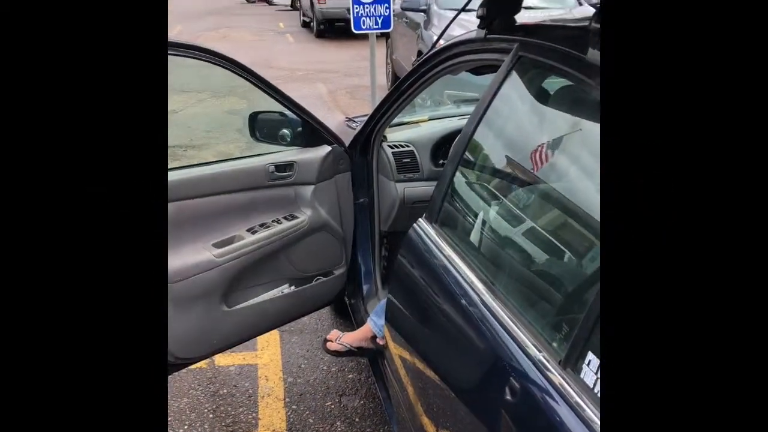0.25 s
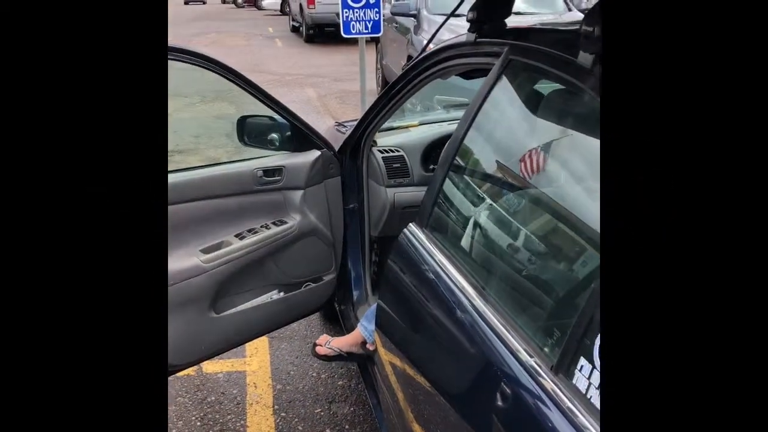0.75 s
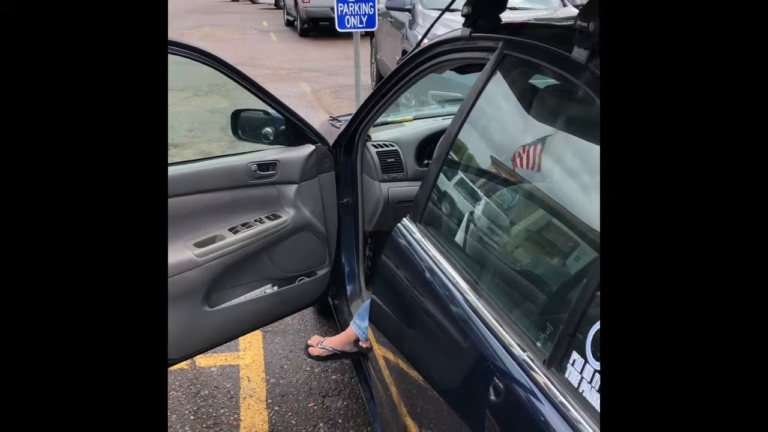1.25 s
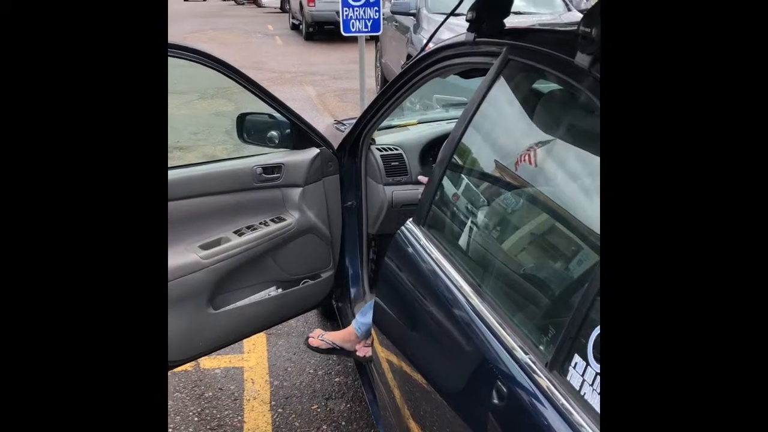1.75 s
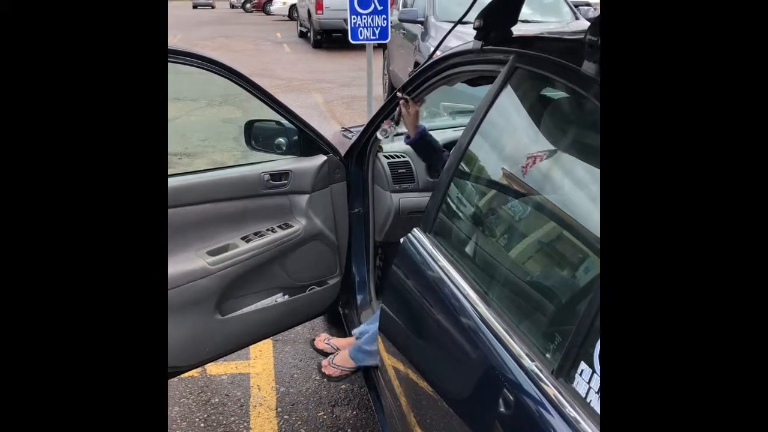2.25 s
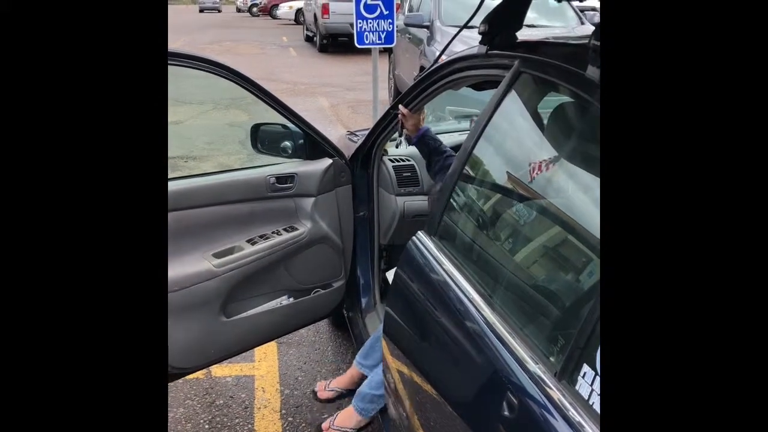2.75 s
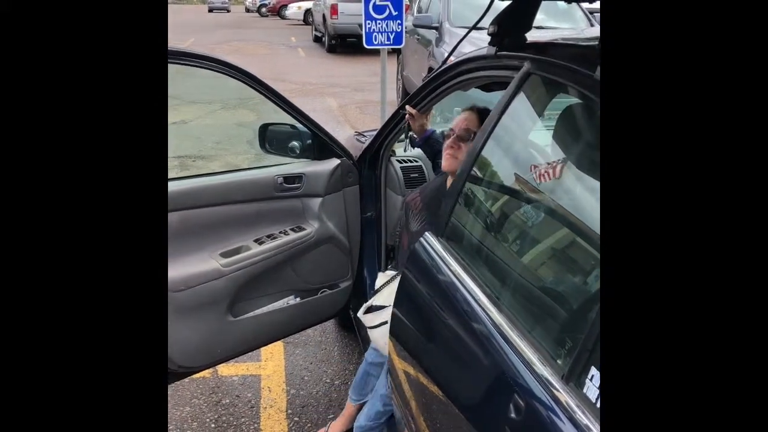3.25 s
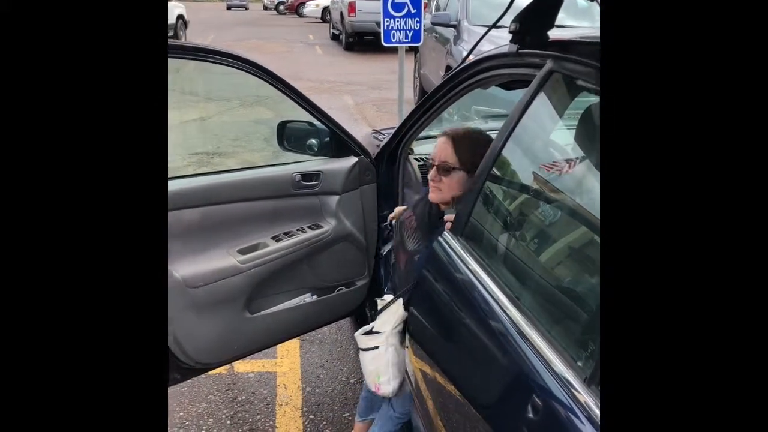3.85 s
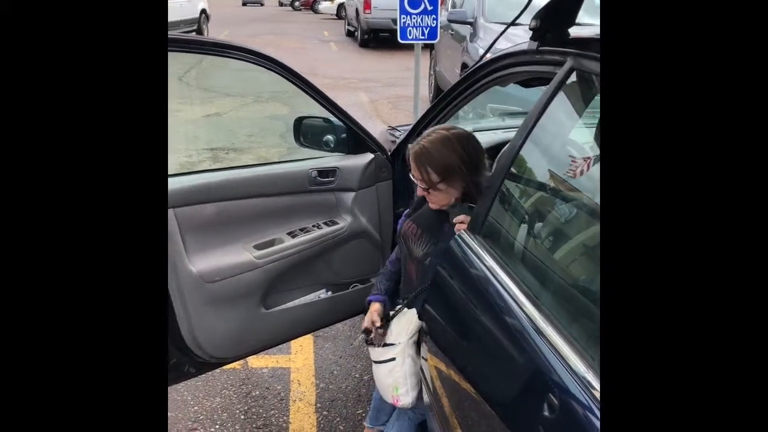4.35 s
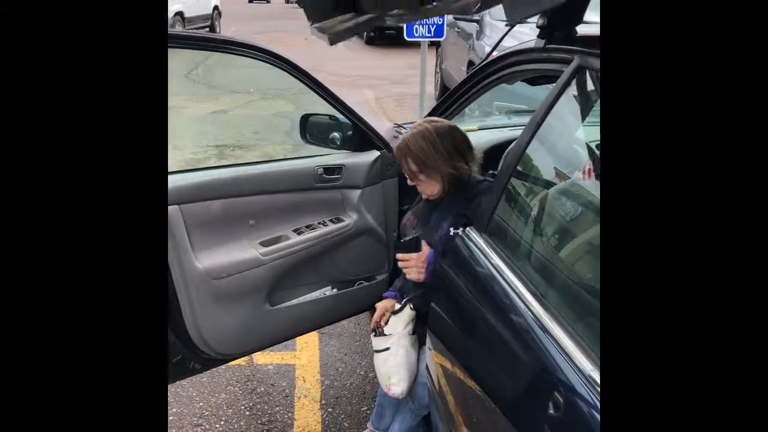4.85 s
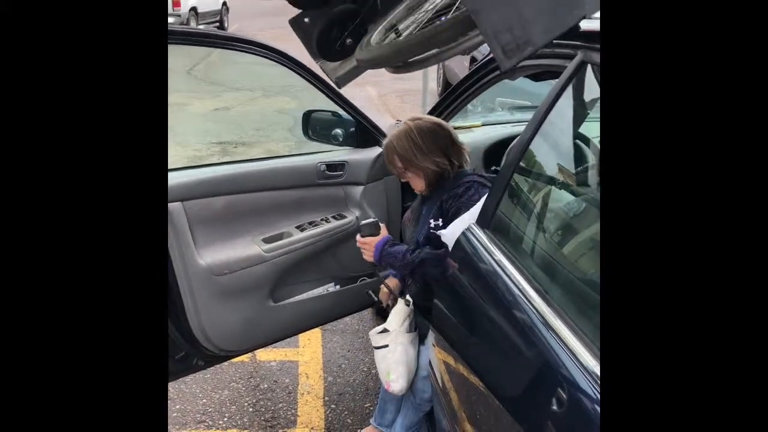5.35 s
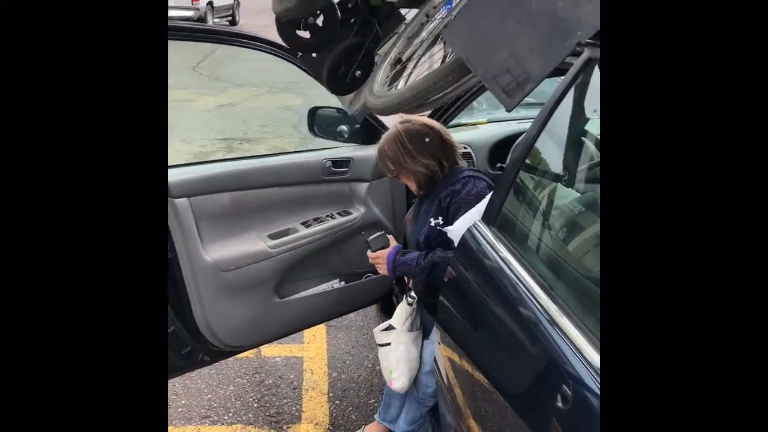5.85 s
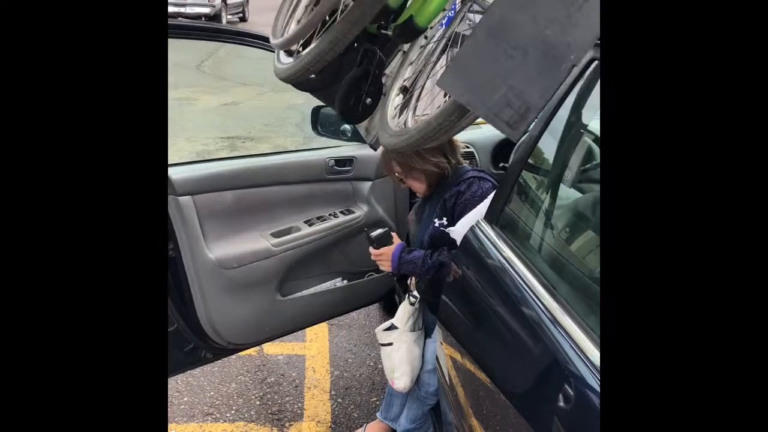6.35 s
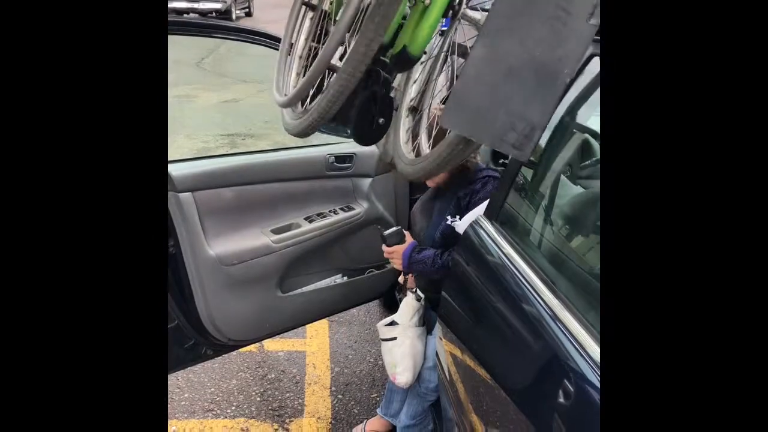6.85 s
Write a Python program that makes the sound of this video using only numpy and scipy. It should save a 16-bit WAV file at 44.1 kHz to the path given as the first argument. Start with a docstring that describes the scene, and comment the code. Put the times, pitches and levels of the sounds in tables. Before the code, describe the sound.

An open parking lot heard close by, with a short scatter of echo from cars. Throughout, a low electric motor hum gains speed steadily, fuller from about 3 seconds, over an idling engine's throb, traffic rumble and soft tyre wash. A thin high sizzle and stronger rumble fade after the first second. A dull knock comes at 0.2, brief creaks at 0.6 to 0.8, then a heavy clattering clunk at 0.85. Sharp snaps follow at 1.1 and, strongest, 1.35, as the engine tone strengthens. Keys jingle lightly from 2.0 to 2.9. Soft knocks at 3.8 lead into the brightest key ring at 4.2 to 4.5, with cloth rustle. Around 5 the engine climbs quickly, with knocks at 5.1 and scattered jingling until 6. A dull knock lands at 6.15; gears whirr from 6.3, squealing briefly at 6.6, and a low engine boom swells at 6.9 to the end at 7.1.

```python
"""A parking lot: a roof carrier's electric motor slowly lowers a folded wheelchair beside a car.
The motor is shaft harmonics with narrow noise bands; an idling engine, firing-rate harmonics, picks up speed.
Traffic is coloured noise. Knocks of the frame ring resonances and catches snap as bursts of noise.
The driver's bunch of keys jingles in decaying modes over grains of cloth and drops into a bag;
late on, the carrier's gears whirr and squeal."""
import sys
import numpy as np
from scipy import signal
from scipy.fft import rfft, irfft, next_fast_len
from scipy.io import wavfile
from scipy.ndimage import uniform_filter1d, map_coordinates

SR = 44100
rng = np.random.default_rng(int(sys.argv[2]) if len(sys.argv) > 2 else 0)


def generate_wav(sig):
    """Save sig (samples, or channels by samples) to the path in sys.argv[1] as 16-bit PCM at SR."""
    pcm = np.round(np.clip(np.atleast_2d(sig).T, -1, 1) * 32767).astype(np.int16)
    wavfile.write(sys.argv[1], SR, pcm)


N = 312228


def amp(db):
    """Decibels to gain."""
    return 10 ** (np.asarray(db) / 20)


def unit(x):
    """Scale to rms 1."""
    return x / np.sqrt(np.mean(x ** 2) + 1e-20)


def along(points, hz):
    """Interpolate (frequency [Hz], value) points on a log-frequency axis."""
    f, v = np.transpose(points)
    return np.interp(np.log(hz + 1), np.log(f + 1), v)


def curves(rows):
    """One value per sample for each column after the time."""
    s, *cols = np.transpose(rows)
    return [np.interp(np.arange(N) / SR, s, c) for c in cols]


def wobble(rate):
    """A smooth random curve with rate knots a second."""
    knots = rng.standard_normal(int(N * rate / SR) + 4)
    return map_coordinates(knots, [np.arange(N) * rate / SR])


def swell(start, length, db, attack, release):
    """Gain that rises up to the start, holds for the length and falls away."""
    corners = [start - attack, start, start + length, start + length + release]
    return amp(db) * np.interp(np.arange(N) / SR, corners, [0, 1, 1, 0])


def filtered(x, response):
    """Shape x by a gain that depends on frequency."""
    m = next_fast_len(len(x) + 8192)
    return irfft(rfft(x, m) * response(np.fft.rfftfreq(m, 1 / SR)), m)[:len(x)]


def noise(spectrum, size=N):
    """Noise of rms 1 with a (frequency [Hz], relative level [dB]) colour."""
    return unit(filtered(rng.standard_normal(size), lambda hz: amp(along(spectrum, hz))))


def resonate(x, modes):
    """Pass x through parallel (frequency [Hz], width [Hz], level [dB]) resonances of alternating sign."""
    def response(f):
        return sum((-1) ** k * amp(db) * 1j * f * width / (centre * centre - f * f + 1j * f * width)
                   for k, (centre, width, db) in enumerate(modes))
    return filtered(x, response)


def patchy(x, depth_db):
    """Give a noise drifting patches in time and frequency, at rms 1."""
    z = signal.stft(x, nperseg=1024)[2]
    field = uniform_filter1d(rng.standard_normal(z.shape), 5, axis=0)
    field = uniform_filter1d(field, 9, axis=1)
    return unit(signal.istft(z * amp(depth_db * unit(field)), nperseg=1024)[1][:N])


def burst(t, attack, t60):
    """A quick rise and an exponential decay."""
    return (1 - np.exp(-t / attack)) * amp(-60 * t / t60)


def struck(x):
    """Scale a hit so that its first 20 ms have rms 1."""
    return x / np.sqrt(np.mean(x[:SR // 50] ** 2) + 1e-20)


def add(track, s, sound):
    """Mix a sound into the track at time s."""
    part = track[round(s * SR):][:len(sound)]
    part += sound[:len(part)]


def hum(speed_hz, orders, flutter_db, drift):
    """Multiples of a shaft speed, each a little unsteady in level and phase."""
    angle = 2 * np.pi * np.cumsum(speed_hz) / SR
    total = 0
    for k, db in orders:
        level = amp(db + flutter_db * wobble(7))
        total = total + level * np.sin(k * angle + rng.uniform(0, 2 * np.pi) + drift * wobble(5.9))
    return np.sqrt(2) * total


# speed of the carrier's motor shaft at the start [Hz] and its steady gain [Hz per s]
SHAFT_HZ, SHAFT_HZ_PER_S = 13.06, 0.407


def shaft_speed():
    """The drive gains speed steadily as the chair swings down."""
    return SHAFT_HZ + SHAFT_HZ_PER_S * np.arange(N) / SR


# gear hum: (time [s], level before trim [dB])
GEAR_HUM = [(0.0, -53), (1.0, -47), (2.7, -43), (3.4, -41), (5.7, -41), (7.08, -45)]
# hum of the motor's housing: (multiple of the shaft speed, relative level [dB])
BODY_ORDERS = [(8, 1), (9, -1), (11, 0), (16, -13)]
BODY_DB = -45


def motor():
    """Gear and housing hum at multiples of the rising shaft speed."""
    shaft_hz = shaft_speed()
    gear_db, = curves(GEAR_HUM)
    gear = amp(gear_db - 1) * hum(shaft_hz, [(12, 0)], flutter_db=1, drift=.1)
    body = amp(BODY_DB) * hum(shaft_hz, BODY_ORDERS, flutter_db=1.8, drift=.06)
    return gear + body


# narrow tones of the idling engine (the first three rows, below 1 kHz) and of the motor's whine (the rest):
# (start [s], length [s], pitch [Hz], level [dB])
NARROW_TONES = [(0.05, 0.5, 468, -55), (0.95, 0.45, 808, -54), (1.4, 0.84, 522, -53.5),
                (2.9, 0.94, 1240, -59.5), (5.165, 0.84, 1203, -54), (6.2, 1, 1310, -56)]
TONE_WIDTH_HZ = 24


def narrow_tones():
    """Narrow bands of noise swell at fixed pitches: first of the idling engine, then the motor's whine."""
    tones = 0
    for start, length, hz, db in NARROW_TONES:
        band = unit(resonate(rng.standard_normal(N), [(hz, TONE_WIDTH_HZ, 0)]))
        tones = tones + swell(start, length, db, attack=0.19, release=0.7) * band
    return tones


# nearby engine: (time [s], crank speed [Hz], firing tone level [dB])
ENGINE = [(0.0, 21.4, -35.5), (0.64, 21, -35.5), (1.03, 19.4, -41), (1.065, 17, -27.5), (1.16, 17.8, -31),
          (1.3, 17.8, -30), (1.65, 18.1, -26.5), (2.05, 18.4, -26.5), (2.24, 17.7, -34.5),
          (2.6, 17.9, -28.5), (2.8, 18.2, -40), (4.7, 19.5, -45.5), (4.85, 20.6, -35), (5.1, 26.6, -32),
          (5.55, 26.7, -30.5), (6.0, 27.2, -38), (6.65, 27.4, -34.5), (7.08, 30.6, -34)]
# each set of orders: (multiple of the crank speed, relative level [dB])
FIRING_ORDERS = [(4, 0), (6, -12), (8, -17)]
THROB_ORDERS = [(2, -1.5), (3, 1)]
DRONE_ORDERS = [(5, 0), (7, -9)]
# the low throb booms briefly: (start [s], length [s], extra level [dB])
SURGE = (6.92, 0.2, 5.5)
IDLE_HZ = 18.5  # crank speed at idle
THROB_DB, THROB_DB_PER_HZ = -55.5, 1.29  # low throb at idle; it grows with crank speed
THROB_DB_PER_HZ_PER_S, FULL_LOAD_HZ_PER_S = 0.47, 6.9  # and with acceleration, up to full load
DRONE_DB, DRONE_DB_PER_HZ = -40.5, -1  # drone at idle; it thins with crank speed


def engine():
    """The exhaust throbs at the firing rate; unequal cylinders add the orders around it, more so under load."""
    crank_hz, firing_db = curves(ENGINE)
    over_idle_hz = crank_hz - IDLE_HZ
    acceleration = uniform_filter1d(np.gradient(crank_hz) * SR, size=SR // 3)
    load = np.clip(acceleration, 0, FULL_LOAD_HZ_PER_S)
    throb_db = THROB_DB + THROB_DB_PER_HZ * over_idle_hz + THROB_DB_PER_HZ_PER_S * load
    start, length, surge_db = SURGE
    throb_db = throb_db + surge_db * swell(start, length, db=0, attack=0.13, release=0.1)
    drone_db = DRONE_DB + DRONE_DB_PER_HZ * over_idle_hz
    firing = amp(firing_db) * hum(crank_hz, FIRING_ORDERS, flutter_db=1.2, drift=0.036)
    throb = amp(throb_db) * hum(crank_hz, THROB_ORDERS, flutter_db=2.5, drift=0.14)
    drone = amp(drone_db) * hum(crank_hz, DRONE_ORDERS, flutter_db=-1.5, drift=0.13)
    # the lowest order sounds only faintly
    return filtered(firing + throb + drone, lambda hz: amp(along([(36, -29), (52, -0.5)], hz)))


# (time [s], tyre wash level before trim [dB], hiss level before trim [dB])
TRAFFIC = [(0.0, -43.5, -51.5), (3.81, -45.5, -58.5), (4.02, -47, -56), (5.98, -45.5, -56.5),
           (6.29, -44, -55.5), (6.49, -44, -52), (7.08, -44.5, -57)]
# colours of the three layers: (frequency [Hz], relative level [dB])
RUMBLE = [(20, -33), (35, -25), (50, 0), (65, 1.5), (100, 1.5), (150, -3.5), (200, -1.5), (260, -12.5),
          (400, -23), (800, -46)]
WASH = [(150, -29), (250, -1), (311, -0.5), (338, -2.5), (450, -7), (518, -7), (600, -6), (722, -7),
        (824, -5), (1060, -7.5), (1200, -7), (1310, -8.5), (2400, -20), (3120, -25), (5280, -120)]
HISS = [(1000, 4.5), (2000, -2), (3200, 2.5), (5000, -2.5), (8000, -9), (12000, -14.5), (16000, -34)]
# the rumble swells: (start [s], length [s], rise before scaling [dB])
RUMBLE_SWELLS = [(0.0, 0.96, 6), (2.75, 0.26, 1.5)]
# a thin high sizzle that fades away: (start [s], length [s], level [dB])
SIZZLE = (0.0, 1.05, -46)
RUMBLE_DB = -38.5  # between swells, about which the level wavers


def traffic():
    """Rumble, tyre wash and hiss from the streets as coloured noise; a thin sizzle lies on top at first."""
    wash_db, hiss_db = curves(TRAFFIC)
    rise_db = sum(db * swell(start, length, db=-1, attack=0.12, release=0.14)
                  for start, length, db in RUMBLE_SWELLS)
    rumble = amp(RUMBLE_DB + rise_db + 2.4 * wobble(9.2)) * noise(RUMBLE)
    wash = amp(wash_db + 0.5 + 0.067 * wobble(30)) * patchy(noise(WASH), depth_db=1.5)
    hiss = amp(hiss_db + 3.0) * patchy(noise(HISS), depth_db=3.0)
    sizzle_noise = noise([(10000, -43), (13000, -18), (14300, -1), (15300, 4), (16000, 4.5)])
    sizzle = swell(*SIZZLE, attack=0.1, release=0.89) * patchy(sizzle_noise, depth_db=1.0)
    return rumble + wash + hiss + sizzle


KNOCK_DETUNE, KNOCK_SCATTER_DB = 0.015, 1.5  # modes shift with the pose: pitch (share) and level
STRIKE_DB_PER_OCTAVE = 10  # modes fall off this fast away from the favoured pitch


def favour(modes, hz):
    """The place of a blow favours the modes near one pitch, a little differently each time."""
    scatter = rng.standard_normal((len(modes), 2))
    return [(centre * (1 + KNOCK_DETUNE * shift), width,
             db + KNOCK_SCATTER_DB * size - STRIKE_DB_PER_OCTAVE * abs(np.log2(centre / hz)))
            for (centre, width, db), (shift, size) in zip(modes, scatter)]


# dull knocks of the frame, levels before trim:
# (time [s], thud level [dB], favoured thud pitch [Hz], clatter level [dB], favoured clatter pitch [Hz])
KNOCKS = [(0.226, -24.5, 205, -54, 1000), (0.826, -33, 260, -29, 1500), (0.833, -31, 335, -32.5, 2750),
          (0.84, -30, 320, -37, 1900), (0.846, -20, 215, -29.5, 900), (0.853, -29, 380, -38, 3000),
          (0.874, -24.5, 200, -60, 1000), (1.206, -36, 200, -46, 1690), (1.466, -36, 413, -60, 1000),
          (2.462, -29.5, 224, -66, 1000), (3.798, -32, 400, -42, 1225), (3.918, -28.5, 367, -54, 1000),
          (4.957, -31, 333, -44, 1400), (5.073, -23.5, 310, -45.5, 1590), (5.384, -43, 327, -39.5, 2860),
          (6.156, -23, 295, -43.5, 1500)]
# resonances of the frame and of its panels: (frequency [Hz], width [Hz], relative level [dB])
FRAME = [(180, 55, 2), (245, 50, 1), (318, 50, 0), (400, 70, -4), (485, 80, -1), (803, 45, 1)]
PANEL = [(915, 70, 3), (1105, 60, 1), (1400, 300, -7), (1810, 130, -2), (2210, 300, -9), (2560, 400, -11),
         (3100, 500, -17), (3690, 80, -8), (5500, 3000, -16)]
PAD_HZ = 1500  # the joints are padded: a push carries little above this pitch


def knocks(thud_t60=0.07, clatter_t60=0.083):
    """Loose joints take up their play: a push and a short rattle into the frame and its panels."""
    out, t = np.zeros(N), np.arange(SR // 3) / SR
    padding = signal.butter(2, PAD_HZ, fs=SR)
    for s, db, thud_hz, clatter_db, clatter_hz in KNOCKS:
        push = 20 * (t == 0) + rng.standard_normal(len(t)) * burst(t, .001, thud_t60)
        thud = resonate(signal.lfilter(*padding, push), favour(FRAME, thud_hz))
        rattle = rng.standard_normal(len(t)) * burst(t, 0.00041, clatter_t60)
        clatter = resonate(rattle, favour(PANEL, clatter_hz))
        add(out, s, amp(db - 9.0) * struck(thud) + amp(clatter_db - 5.0) * struck(clatter))
    # a slight tilt away from the treble
    return filtered(out, lambda hz: amp(along([(2800, 2.3), (12000, 0)], hz)))


# creaks before the frame clunks: (start [s], length [s], level [dB])
CREAKS = [(0.613, 0.022, -46.5), (0.762, 0.031, -42.5)]
# resonances of the pivot: (frequency [Hz], width [Hz], relative level [dB])
PIVOT = [(894, 21, 2), (1860, 31, -12), (2670, 100, -13)]


def creak():
    """A pivot rubs: noise rings its resonances in short swells."""
    gain = sum(swell(*row, attack=0.042, release=0.036) for row in CREAKS)
    return gain * unit(resonate(rng.standard_normal(N), PIVOT))


# sharp snaps of catches and buckles, and a dry tick of the keys at 2.81 s:
# (time [s], level before trim [dB])
SNAPS = [(0.6104, -29.5), (1.127, -24.5), (1.353, -18), (1.359, -18.5), (2.81, -33.5), (3.1807, -41),
         (3.274, -41.5), (4.013, -31), (4.8731, -35), (5.4, -31)]
# (frequency [Hz], relative level [dB])
SNAP_COLOUR = [(290, -7), (500, -3.5), (878, 1), (1240, -10.5), (1440, 0.5), (1970, -1.5), (2630, -7),
               (3420, -2), (4370, -6), (11300, -9.5), (15800, -13)]


def snaps(t60=0.042):
    """Dry, bright cracks of decaying noise: catches letting go, and one tick of the keys."""
    out, t = np.zeros(N), np.arange(SR // 5) / SR
    for s, db in SNAPS:
        crack = struck(noise(SNAP_COLOUR, size=len(t)) * burst(t, 0.0018, t60))
        add(out, s, amp(db - 14.0) * crack)
    return out


# the hand stirs keys and cloth: (start [s], length [s], level [dB])
HANDLING = [(1.91, 0.063, -58.5), (2.068, 0.071, -55.5), (2.528, 0.071, -51.5), (2.682, 0.063, -55.5),
            (4.067, 0.02, -52), (4.16, 0.093, -44.5), (4.71, 0.026, -52.5), (4.95, 0.02, -47.5),
            (5.189, 0.037, -50), (5.38, 0.29, -55), (6.722, 0.15, -59)]
STIR_ATTACK_S, STIR_RELEASE_S = 0.074, 0.05


def stirring():
    """Gain of the hand's strokes among keys and cloth."""
    return sum(swell(*row, attack=STIR_ATTACK_S, release=STIR_RELEASE_S) for row in HANDLING)


# modes of the keys, shared by the rustle, touches and contacts: (frequency [Hz], relative level [dB])
KEY_MODES = [(5346, -9), (6270, -9), (6465, -7), (7230, -9), (7495, -3), (7965, -7), (8017, -2), (8220, -6),
             (8470, -10), (9609, -3), (10780, -3), (10936, -1), (11130, -2), (12300, -7), (12870, 1),
             (13087, -1), (14154, 2), (14450, -4), (14704, 0), (15670, -3)]


def rustle(grain_db=4, clinks_per_s=260, size_db=12.0, clink_t60=0.029):
    """Cloth scrapes in tiny grains while the keys brush each other, one faint ring at a time."""
    cloth = noise([(1500, -41), (3500, 4.5), (7000, 5.5), (11000, 8), (15500, 4.0)])
    grains = unit(amp(grain_db * wobble(180)) * cloth)
    clinks, t = np.zeros(N), np.arange(SR // 10) / SR
    for when, which, size, shift in rng.random((int(clinks_per_s * N / SR), 4)):
        hz, db = KEY_MODES[int(which * len(KEY_MODES))]
        detuned_hz = hz * (1 + 0.0091 * (shift - .5))
        ring = burst(t, 0.0004, clink_t60) * np.sin(2 * np.pi * detuned_hz * t)
        add(clinks, when * N / SR, amp(db - size_db * np.log(size + 0.058)) * ring)
    return stirring() * amp(2.8 * wobble(35)) * (grains + amp(-13.0) * unit(clinks))


TOUCHES_PER_S = 26  # chances of a light contact; it sounds only while the hand stirs
TOUCH_DB, TOUCH_SCATTER_DB = 5.5, -3.5  # over the stirring gain, before the trims in keys()
TOUCH_TICK_DB, TOUCH_SHIMMER_DB = -10, -9  # relative to the ring, before those trims
TOUCH_BIG_KEY_DB = -40  # the largest key barely stirs


def touches():
    """Light contacts of the smaller keys follow the strength of the stirring, in rows like those of KEYS."""
    gain, small_keys, rows = stirring(), KEY_MODES[9:], []
    for k, (when, which, size) in enumerate(rng.random((int(TOUCHES_PER_S * N / SR), 3))):
        s = (k + when) / TOUCHES_PER_S
        stir = gain[int(s * SR)]
        if stir > 0:
            db = 20 * np.log10(stir) + TOUCH_DB + TOUCH_SCATTER_DB * (2 * size - 1)
            ring_hz = small_keys[int(which * len(small_keys))][0]
            rows.append((s, db, ring_hz, db + TOUCH_TICK_DB, db + TOUCH_SHIMMER_DB, db + TOUCH_BIG_KEY_DB))
    return rows


# the loudest key contacts, levels before trim: (time [s], ring level [dB], favoured ring pitch [Hz],
# tick level [dB], shimmer level [dB], largest key level [dB])
KEYS = [(2.056, -44, 7500, -49, -52, -69), (2.151, -48, 8000, -46.5, -54, -65),
        (2.1836, -36.5, 10900, -55, -49, -69), (2.302, -30, 10860, -52, -47, -69),
        (2.3184, -36, 14150, -49, -37.5, -68), (2.391, -40, 14150, -58, -46, -49),
        (2.413, -35, 7540, -59, -41, -58), (2.4215, -28, 9600, -57, -36.5, -68),
        (2.528, -34, 13100, -61, -50, -69), (2.585, -43, 6465, -54, -45, -58),
        (2.635, -45, 6270, -60, -52, -69), (2.69, -41, 7160, -59, -45, -69),
        (2.729, -39, 9610, -60, -43.5, -69), (2.83, -27, 9600, -51, -41, -68),
        (2.8778, -33.5, 11000, -58, -50, -56), (2.911, -46, 6270, -58, -61, -69),
        (3.8717, -41, 5900, -47, -43, -56), (3.936, -34, 14150, -55, -35, -47),
        (3.966, -41, 12900, -57, -50, -69), (4.122, -40, 14450, -58, -48, -66),
        (4.17, -36, 14150, -51, -38, -62), (4.1774, -24, 11000, -46, -33, -55),
        (4.203, -26, 11000, -57, -44, -64), (4.2482, -17, 7750, -59, -33, -62),
        (4.2665, -34, 8000, -48, -38, -62), (4.3822, -12.5, 7900, -45, -32, -50),
        (4.402, -26, 7900, -49, -30, -29.5), (4.4514, -31, 14800, -61, -43, -64),
        (4.591, -43, 6465, -61, -46, -66), (4.6443, -46, 6465, -61, -40.5, -66),
        (5.04, -44, 10900, -51, -61, -69), (5.1456, -38, 15600, -51, -47, -64),
        (5.233, -35, 11200, -52, -47, -66), (5.2753, -28, 7520, -40.5, -36, -37),
        (5.3702, -31, 11220, -44.5, -35, -56), (5.4595, -31, 12800, -41.5, -43, -45),
        (5.471, -25.5, 7500, -54, -40, -43), (5.486, -23, 8140, -57, -38, -39),
        (5.505, -34, 7495, -58, -45, -37), (5.5263, -31, 13090, -62, -34, -43),
        (5.6256, -40, 12800, -43.5, -40.5, -58), (5.675, -39, 10936, -64, -46, -68),
        (5.6949, -42, 13000, -57, -35.5, -67), (5.8004, -34, 11000, -49, -42, -54),
        (5.8237, -34, 14480, -52, -41, -56), (5.8645, -33.5, 11170, -60, -40, -65),
        (5.9609, -30, 11000, -55, -41.5, -48), (6.2596, -45, 10960, -60, -52, -69),
        (6.4344, -42, 10800, -53, -39, -49), (6.4698, -35, 10900, -52, -47, -66),
        (6.5056, -48, 10750, -62, -49, -69), (6.7191, -44, 7400, -58, -45.5, -62)]
KEY_ATTACK_S = 0.0012
# the bunch presses differently at each contact: scatter of pitch (share) and of ring time (dB)
GRIP_DETUNE, GRIP_DAMPING_DB = 0.002, 2
DAMPING_HZ = 8000  # nominal ring time applies here; higher modes ring for less
BIG_KEY_HZ, BIG_KEY_DETUNE = 5335, 0.002  # lowest mode of the largest key and its scatter (share)
# chinks of pinched keys: mean delay (s), pitch scatter (share), level against the shimmer (dB)
CHINK_S, CHINK_SPREAD, CHINK_DB = 0.005, 0.04, -3
# free-hanging keys sing on faintly: level against the shimmer (dB), ring time (s)
AFTER_RING_DB, AFTER_RING_T60 = -9, 0.16


def keys(ring_t60=0.07, shimmer_t60=0.042, focus_octaves=0.015, tick_t60=0.035,
         scrape_db=-6, rebound_db=-7, big_key_t60=0.02):
    """Each contact ticks, rings near one pitch, nudges the largest key and shakes the bunch into a shimmer."""
    out, t = np.zeros(N), np.arange(SR // 9) / SR
    hz, level = np.transpose(KEY_MODES)[:, :, None]
    sustained = burst(t, KEY_ATTACK_S, AFTER_RING_T60) * np.sin(2 * np.pi * hz * t)

    def shimmer(spread):
        """The other keys differ a little in size and knock in turn within spread seconds."""
        size, shift, grip = rng.standard_normal((3, len(hz), 1))
        since = np.maximum(t - spread * rng.random((len(hz), 1)), 0)
        modes = amp(level + 5.5 * size) * np.sin(2 * np.pi * hz * (1 + .005 * shift) * since)
        return (modes * burst(since, KEY_ATTACK_S, shimmer_t60 * amp(2 * grip))).sum(0)

    def chinks(t60=0.01):
        """Keys pinched between their neighbours give very short rings, each off its free pitch."""
        size, shift = rng.standard_normal((2, len(hz), 1))
        since = np.maximum(t - rng.exponential(CHINK_S, (len(hz), 1)), 0)
        modes = amp(level + 4.0 * size) * np.sin(2 * np.pi * hz * (1 + CHINK_SPREAD * shift) * since)
        return (modes * burst(since, 0.00028, t60)).sum(0)

    for s, db, ring_hz, tick_db, shimmer_db, big_key_db in list(KEYS) + touches():
        nearness = amp(level) / (1 + (np.log2(hz / ring_hz) / focus_octaves) ** 2)
        shift, grip = rng.standard_normal((2, len(hz), 1))
        decay = burst(t, KEY_ATTACK_S, ring_t60 * DAMPING_HZ / hz * amp(GRIP_DAMPING_DB * grip))
        cycles = hz * (1 + GRIP_DETUNE * shift) * t + rng.random((len(hz), 1))
        ring = struck((nearness * decay * np.sin(2 * np.pi * cycles)).sum(0))

        big_hz = BIG_KEY_HZ * (1 + rng.normal(0, BIG_KEY_DETUNE))
        big_key = struck(burst(t, 0.00084, big_key_t60) * np.sin(2 * np.pi * big_hz * t))

        free = struck(shimmer(spread=0.0046) + amp(rebound_db) * shimmer(spread=0.029))
        after_ring = struck((amp(level + 4 * rng.standard_normal(level.shape)) * sustained).sum(0))
        bunch = struck(free + amp(CHINK_DB) * struck(chinks()) + amp(AFTER_RING_DB) * after_ring)

        scrape_noise = noise([(4000, -17), (10000, -7), (15500, -10)], size=len(t))
        scrape = struck(scrape_noise * burst(t, 0.0016, 0.037))
        tick_noise = noise([(1000, -9), (3000, 12.0), (6000, 1.5), (10000, -4.5)], size=len(t))
        tick = struck(tick_noise * burst(t, 0.0014, tick_t60))

        contact = amp(db - 15) * ring + amp(big_key_db - 11) * big_key
        contact += amp(shimmer_db - 6.5) * (bunch + amp(scrape_db) * scrape)
        contact += amp(tick_db - 3.5) * tick
        add(out, s, contact)
    return out


# the carrier's gears whirr briefly: (start [s], length [s], level [dB])
WHIRR = (6.3, 0.39, -54.5)
# resonances of the gearbox: (frequency [Hz], width [Hz], relative level [dB])
GEARS = [(2140, 120, -3), (2350, 220, -3), (3250, 250, -5), (3560, 300, -5), (4050, 200, -9)]
# a short squeal within the whirr: (start [s], length [s], level [dB])
SQUEAL = (6.617, 0.045, -51)
# (frequency [Hz], relative level [dB])
SQUEAL_MODES = [(2130, 0), (3320, 0)]
MESH_WAVER, MESH_SCATTER_DB = 0.025, 4  # the teeth catch unevenly: in rate (share) and in force
SQUEAL_WAVER, SQUEAL_ROUGH_DB = 0.013, 4  # unsteadiness of its pitch (share) and level


def rasp():
    """Gear teeth catch one by one and ring the gearbox; for a moment they slip into a rough, wavering squeal."""
    teeth_passed = np.cumsum(12 * shaft_speed() * (1 + MESH_WAVER * wobble(22))) / SR
    catches = np.diff(np.floor(teeth_passed), prepend=0) * amp(MESH_SCATTER_DB * rng.standard_normal(N))
    box = resonate(unit(catches) + amp(-6) * rng.standard_normal(N), GEARS)
    box = filtered(box, lambda hz: amp(along([(4100, -2), (5000, -12)], hz)))
    whirr_gain = amp(2.4 * wobble(45)) * swell(*WHIRR, attack=0.037, release=0.33)
    whirr = whirr_gain * patchy(box, depth_db=4.5)
    slip = 0
    for hz, db in SQUEAL_MODES:
        angle = 2 * np.pi * np.cumsum(hz * (1 + SQUEAL_WAVER * wobble(120))) / SR
        slip = slip + amp(db + SQUEAL_ROUGH_DB * wobble(200)) * np.sin(angle)
    return whirr + swell(*SQUEAL, attack=0.013, release=0.04) * unit(slip)


# decay of the echo: (frequency [Hz], time to fall by 60 dB [s])
LOT = [(150, 0.31), (2000, 0.044), (12000, 0.079)]


def echo(x):
    """The parked cars scatter a short tail: decaying noise, 5 ms behind the sound."""
    hz, t, z = signal.stft(rng.standard_normal(SR // 2), SR, nperseg=256)
    decay = amp(-60 * t / along(LOT, hz)[:, None])
    tail = signal.istft(z * decay, SR, nperseg=256)[1]
    return signal.fftconvolve(np.pad(x, (SR // 200, 0)), tail / np.linalg.norm(tail))[:N]


def scene():
    """Machines, traffic and rustle under the knocks, snaps and jingles; only these hits echo."""
    steady = motor() + narrow_tones() + engine() + traffic() + creak() + rustle() + rasp()
    hits = knocks() + snaps() + keys()
    return (steady + hits + amp(-8.5) * echo(hits))[None]


TOP_HZ = 15950


def record(dry):
    """Nothing passes above the band limit."""
    return filtered(dry[0], lambda hz: hz < TOP_HZ)[None]


dry = scene()
out = record(dry)
generate_wav(out)
```